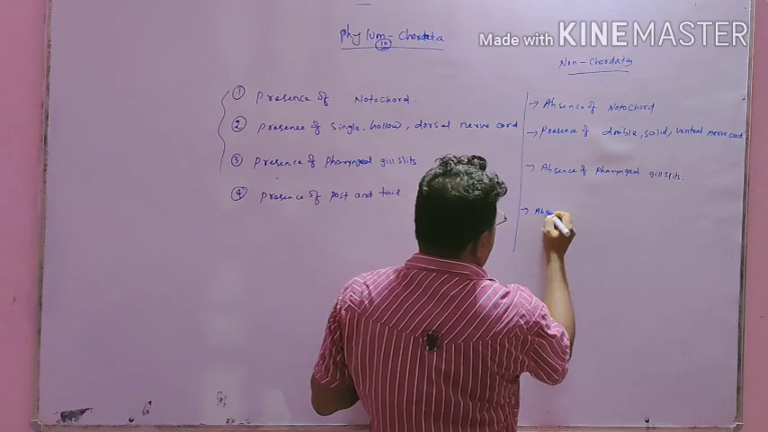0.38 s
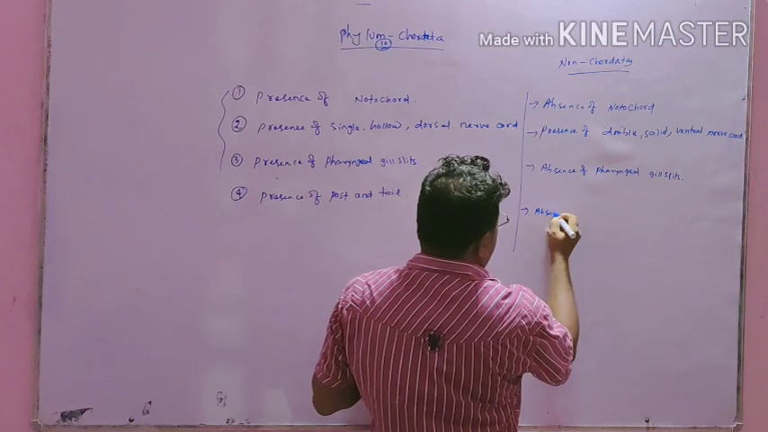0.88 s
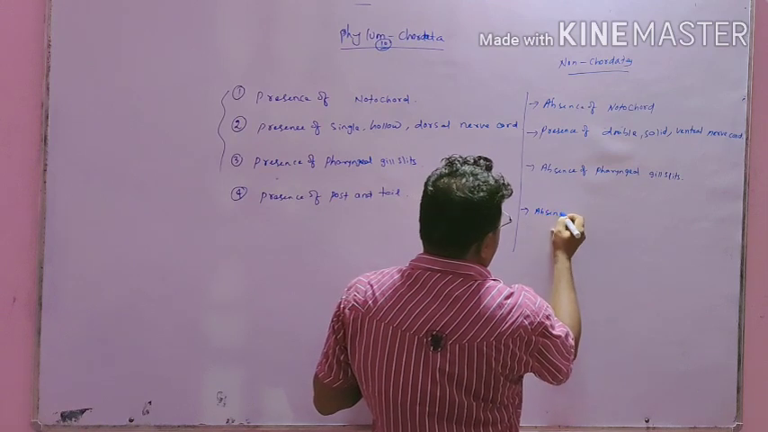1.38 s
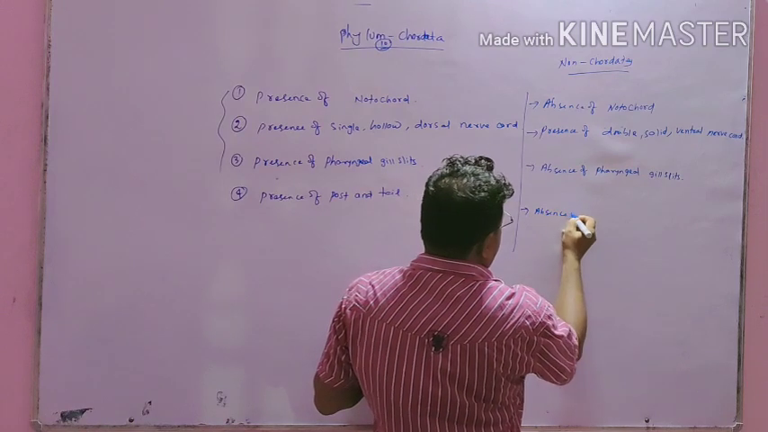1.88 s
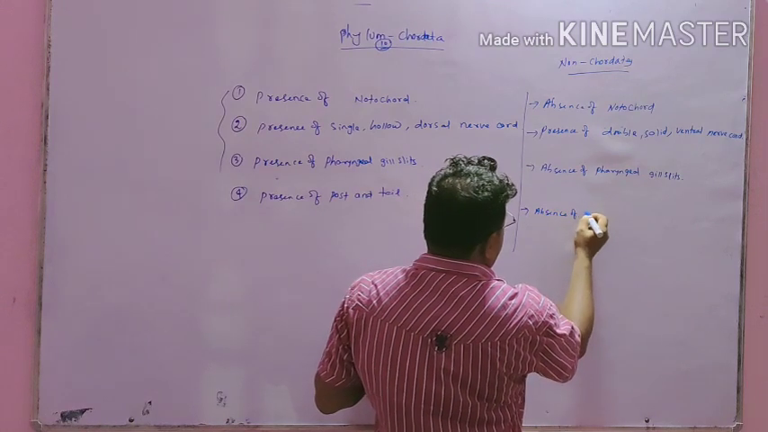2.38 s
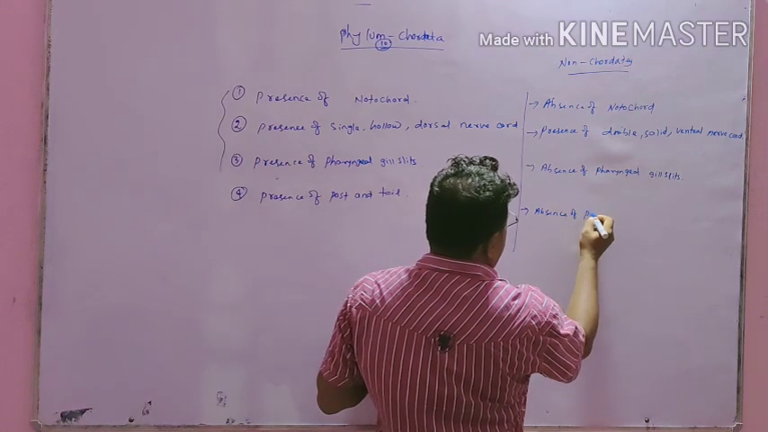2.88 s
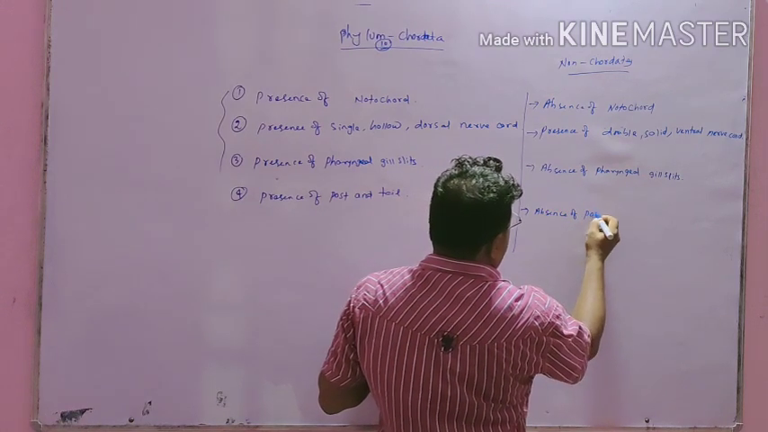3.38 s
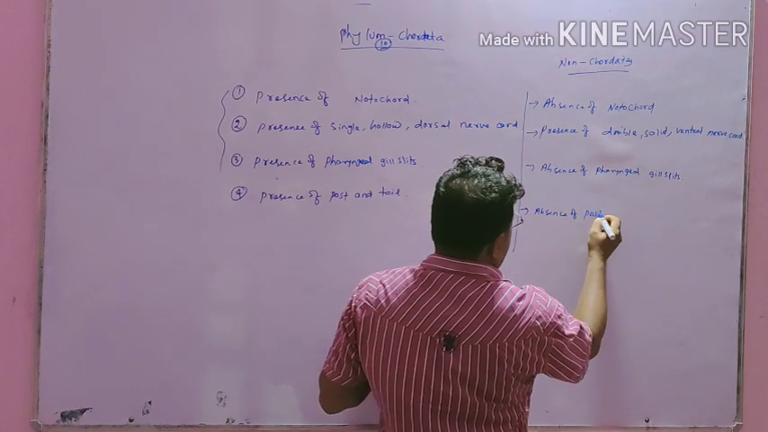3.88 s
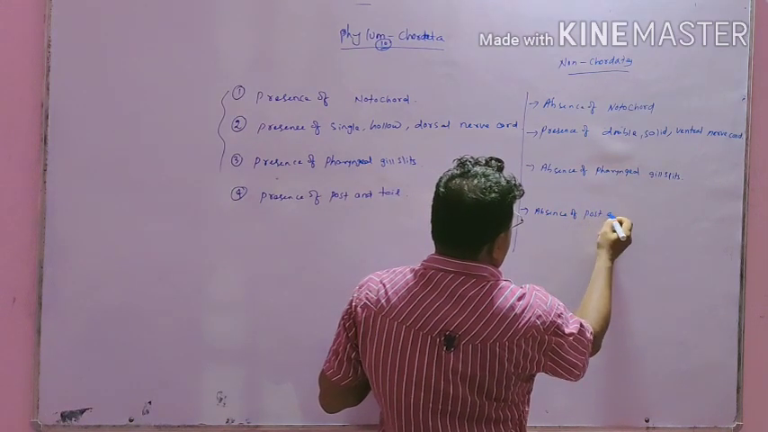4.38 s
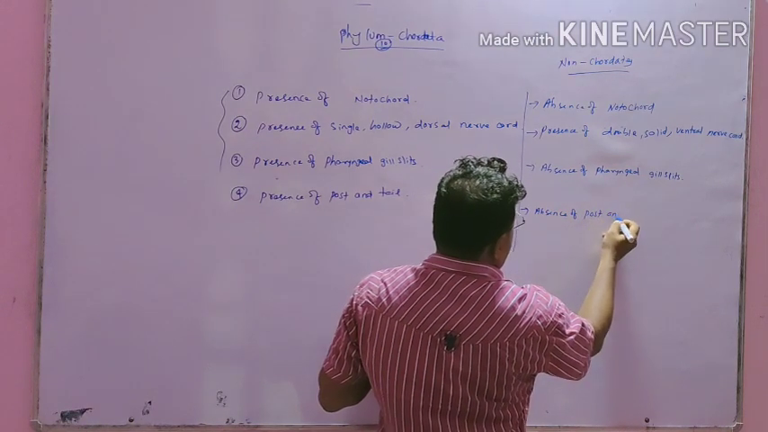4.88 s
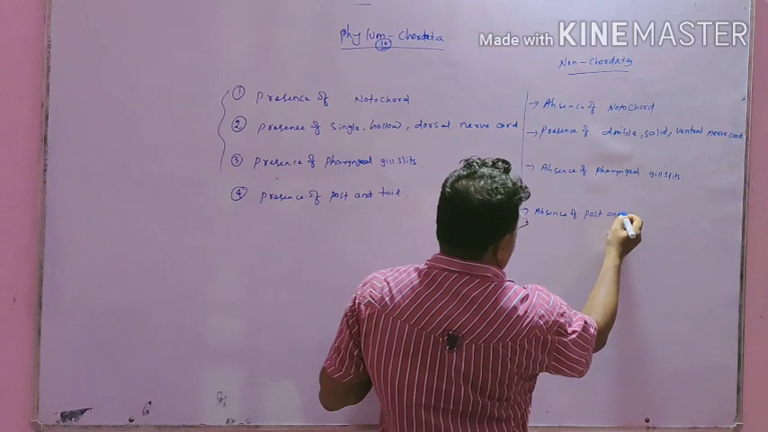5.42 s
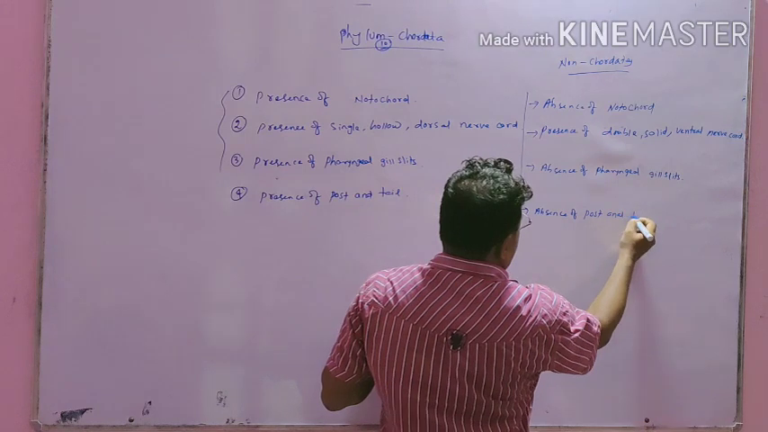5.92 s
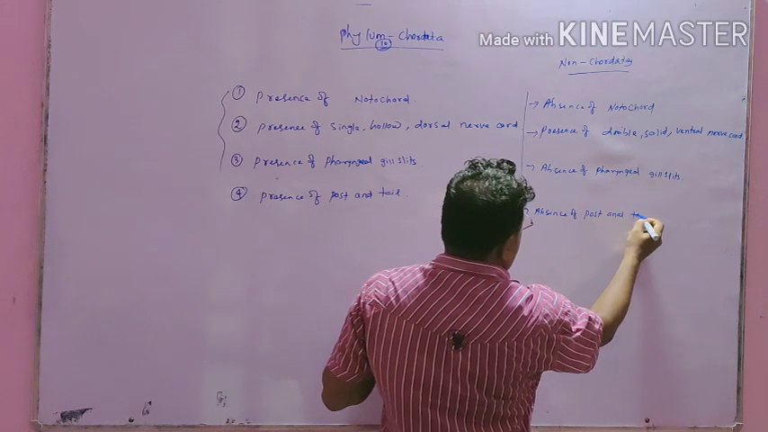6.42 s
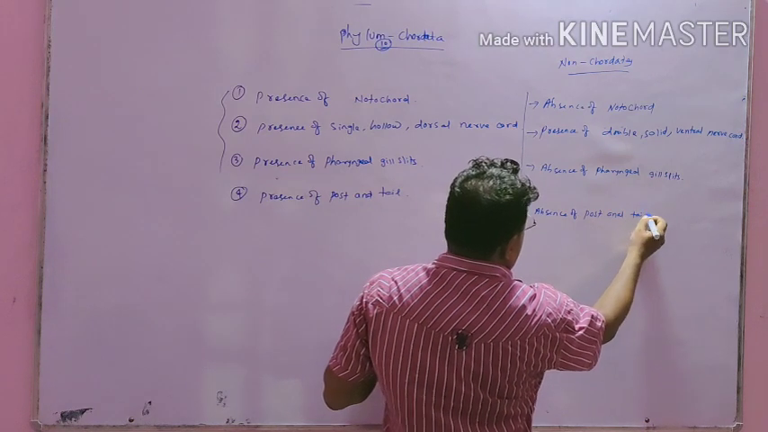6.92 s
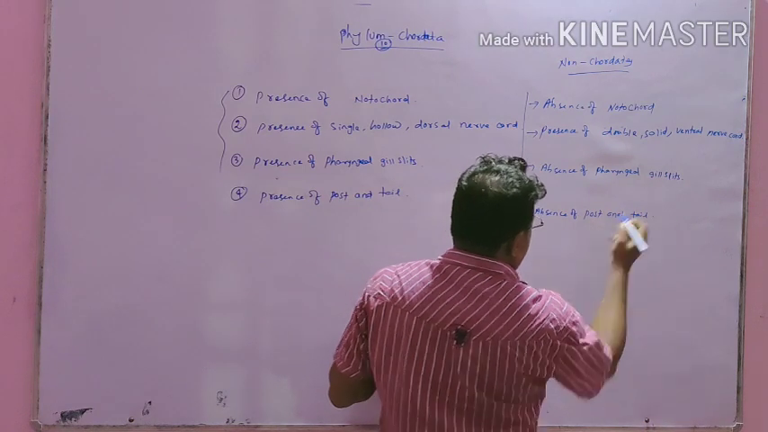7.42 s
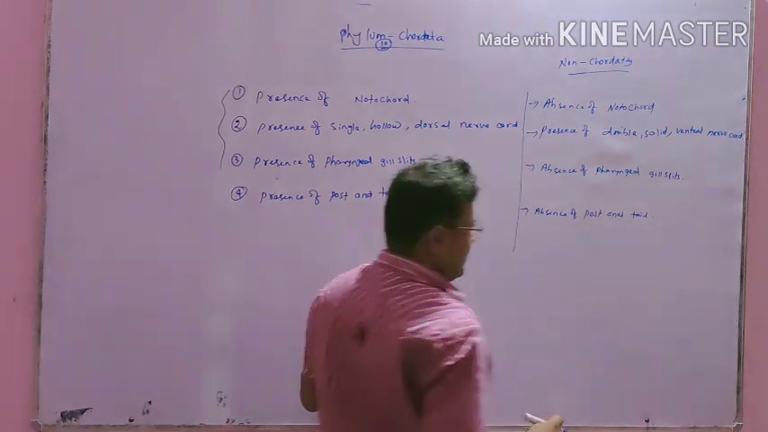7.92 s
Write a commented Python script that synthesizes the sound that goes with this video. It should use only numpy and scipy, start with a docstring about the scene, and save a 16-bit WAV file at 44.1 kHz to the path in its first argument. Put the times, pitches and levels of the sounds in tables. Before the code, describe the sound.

Low wind buffeting slaps the microphone, mostly on the left, in a quiet fan-cooled room with crickets and tiny far hoots behind.

```python
"""A draught from a fan rumbles and slaps in the two bare microphone ports, in a quiet room at night.
The wind is noise under gust envelopes, with sudden fronts, single eddies and one brief whistle, at each port
on its own. Crickets outside on both sides are narrow noise cut by wing strokes; far hoots and peeps are
gliding, wavering tones. Fan wash and outdoor rumble are shaped noise, the motor hum narrow bands of noise;
tiny random tonal pips and a faint hiss, such as digital processing leaves behind, lie underneath."""
import sys
import numpy as np
from scipy import signal
from scipy.io import wavfile
from scipy.ndimage import uniform_filter1d

SR = 44100
rng = np.random.default_rng(int(sys.argv[2]) if len(sys.argv) > 2 else 0)


def pcm_store(signal):
    """Save signal as 16-bit PCM."""
    levels = np.round(np.clip(np.atleast_2d(signal), -1, 1) * 32767)
    wavfile.write(sys.argv[1], SR, levels.astype(np.int16).T)


def magnitude_from_level(level_db):
    """Linear magnitude for a level in decibels (20 dB per decade)."""
    exponent = np.asarray(level_db, float) / 20
    return 10 ** exponent


N = 354255  # samples

# Draught gusts, one list each for left and right port: [arrival t/s, held t/s, level/dB, dying away/(dB/s)]
GUSTS = [
    [(0.0, 0.0028, -36, 65.5), (.25, 0.05, -38.5, 100), (.31, 0.019, -32.5, 148), (.39, 0.026, -26, 225.5),
     (.5, 0.015, -34, 61), (.743, 0.011, -42.5, 87), (1.062, 0.0066, -26.5, 247.5),
     (1.14, 0.096, -32, 69.5), (1.26, 0.05, -29.5, 159.5), (1.49, 0.0076, -32.5, 196),
     (1.52, 0.011, -23, 159.5), (1.65, 0.056, -43.5, 36), (1.77, 0.15, -40.5, 88),
     (2.595, 0.0076, -29, 172), (2.685, 0.0038, -18, 188), (2.81, 0.048, -28.5, 59),
     (3.013, 0.19, -25.5, 495), (3.265, 0.015, -23, 77.5), (3.4, 0.097, -28, 100),
     (3.545, 0.066, -26.5, 273), (3.69, 0.09, -29, 104), (3.86, 0.18, -35, 154.5),
     (3.985, 0.018, -23, 120.5), (4.06, 0.11, -25.5, 198.5), (4.205, 0.048, -29.5, 293.5),
     (4.3, 0.12, -41.5, 120.5), (4.565, 0.046, -21, 303.5), (4.67, 0.084, -26.5, 120),
     (5.16, 0.074, -37.5, 96), (5.708, 0.043, -44.5, 119), (6.615, 0.017, -28.5, 129.5),
     (6.745, 0.022, -31, 122), (6.81, 0.032, -26, 103.5), (7.31, 0.044, -50.5, 140)],
    [(.534, .005, -47, 44), (1.571, 0.2, -55, 162.5), (2.755, 0.062, -39.5, 131), (3.02, 0.033, -37, 63),
     (3.07, 0.053, -29, 98), (3.14, 0.078, -23.5, 112.5), (3.36, 0.016, -22.5, 200.5),
     (3.49, 0.023, -30.5, 186), (3.65, 0.07, -36.5, 203), (3.73, 0.0068, -22, 244),
     (3.8, 0.048, -34.5, 107), (4.01, 0.083, -28, 299), (4.1, 0.039, -24.5, 497),
     (4.19, 0.04, -41.5, 119.5), (4.765, 0.01, -51, 72), (5.18, 0.015, -47, 123)],
]
# Air between gusts at the left and right port: [lowest level/dB]
CALM_DB = [-86, -79]
GUST_RISE_DB_PER_S = 1099.5
# Gust fronts, left port then right, levels before the bass cut:
# [onset t/s, starting level/dB, starting upper edge f/Hz, time to fade by 20 dB t/s]
FRONTS = [
    [(0.002, -41.5, 550, 0.1), (0.334, -39.5, 529, 0.22), (1.524, -36.5, 1175, 0.12),
     (2.605, -38, 700, 0.07), (2.716, -34.5, 665, 0.2), (3.011, -33.5, 863, 0.07), (3.08, -28, 607, 0.2),
     (3.174, -29, 821, 0.1), (3.29, -35, 592, 0.54), (3.441, -36.5, 656, 0.42), (3.984, -26.5, 792, 0.07),
     (4.066, -36.5, 619, 0.48), (4.558, -36, 786, 0.24), (4.578, -27.5, 633, 0.12),
     (4.719, -40.5, 735, 0.16), (6.863, -51, 543, 0.5)],
    [(3.166, -30.5, 542, 0.18), (3.232, -26, 558, 0.03), (3.373, -34.5, 470, 0.3), (4.116, -32, 594, 0.2)],
]
# Single eddies slapping the left port, then the right: [centre t/s, peak level before the bass cut/dB, f/Hz]
SLAPS = [
    [(0.34, -17.5, 241), (0.743, -19.5, 118), (1.064, -17, 150), (1.518, -19.5, 145), (1.52, -19, 610),
     (1.541, -22.5, 518), (1.574, -29.5, 480), (1.543, -17.5, 222), (1.564, -18.5, 181),
     (1.839, -21.0, 252), (2.619, -15.5, 177), (2.692, -16.5, 170), (2.694, -22.5, 400),
     (2.723, -22.5, 470), (2.724, -12.5, 256), (3.013, -14, 145), (3.088, -9, 147), (3.089, -22, 380),
     (3.177, -14, 243), (3.217, -12, 150), (3.448, -18.5, 199), (3.503, -32, 453), (3.551, -12, 228),
     (3.552, -26.5, 377), (3.598, -15.5, 230), (3.599, -31, 400), (3.987, -29.5, 520), (3.988, -7, 133),
     (4.07, -25.5, 460), (4.024, -13, 248.5), (4.219, -13.5, 178), (4.582, -16, 422), (4.583, -13, 233),
     (4.61, -9, 147), (4.725, -12.5, 185), (4.758, -13.5, 188), (6.565, -24.5, 134), (6.765, -21, 166),
     (6.87, -21.5, 240)],
    [(3.161, -14.5, 158.6), (3.186, -19, 174), (3.423, -18, 202), (3.745, -21.5, 150), (4.095, -9.5, 186),
     (4.122, -8.5, 172)],
]
# Air whistling briefly at the left port: (onset t/s, time to fade by 20 dB t/s, f/Hz, width f/Hz, level/dB)
WHISTLE = (4.572, .12, 890, 100, -54)
LOW_HZ = np.arange(24)[:, None] * SR / 512  # wind noise bins, up to 2 kHz

# Spectrum of fan wash and outdoor rumble: [f/Hz, relative level per Hz/dB]
ROOM = [(60, -1.5), (200, -6.5), (300, -8.5), (460, -8), (960, -14.5), (1150, -20.5), (1340, -27.5),
        (1800, -26.5), (5000, -43), (8000, -44)]
# How alike that wash is at the two ports: [f/Hz, left-right likeness from -1 to 1]
SAME = [(240, 0.08), (470, 0.82), (940, 0.18), (1800, 0.033)]
# Fan motor hum, before the bass cut: [f/Hz, level/dB]
HUM = [(102, -71.5), (199, -71), (350, -75.5), (2618, -102)]
ROOM_DB = -63.5  # wash rms before the bass cut

# Steady cricket, heard on both sides, straying behind (positive) or ahead (negative) of its beat: [t/s, lag t/s]
LAG = [(0, 0.0068), (2.2, -0.067), (3.5, 0.075), (4.1, 0.053), (4.4, 0.022), (4.7, -0.0084), (6.8, 0.052),
       (7.7, -0.019)]
# Its wing on the left, then the right: [f/Hz, width f/Hz, typical level/dB]
BEAT_WING = [(6930, 59, -80.5), (7040, 54, -78.5)]
BEAT_S, BEAT_CHIRP_S, BEAT_SPREAD_DB = .334, .13, 2.5
# Fitful cricket on the left, another on the right: [start t/s, length t/s, level/dB]
CALLS_FITFUL = [
    [(0.32, 0.19, -68), (.94, 0.12, -69.5), (1.3, 0.096, -72), (1.63, 0.18, -72), (1.89, 0.054, -72.5),
     (2.59, 0.057, -75.5), (2.92, 0.11, -72), (3.31, 0.17, -68), (3.64, .06, -75.5), (4.05, 0.12, -72),
     (4.29, 0.16, -69.5), (4.95, 0.087, -76), (5.64, 0.12, -67.5), (5.86, 0.06, -71.5), (6.01, 0.1, -70.5),
     (6.34, 0.15, -70), (6.68, 0.14, -71), (6.87, 0.065, -75), (7.05, 0.072, -70.5), (7.33, 0.12, -72.5),
     (7.66, 0.19, -76), (7.95, 0.068, -74)],
    [(.02, 0.027, -71), (.32, 0.089, -81.5), (1.25, 0.18, -82.5), (2.25, 0.14, -79), (4.6, 0.13, -75),
     (5.3, 0.17, -81), (5.98, 0.17, -77)],
]
# Their wings, left then right: [f/Hz, width f/Hz]
FITFUL_WING = [(6690, 91), (6790, 100)]
# Farther insects on the left, then the right: [level/dB]
CHORUS_DB = [-81.5, -92]
STROKES_PER_S = 62  # average wing stroke rate

# Far hoots: [middle t/s, length t/s, f/Hz, glide f/Hz, starting level/dB, left minus right level/dB]
HOOTS = [(0.259, 0.042, 845, 0, -64, -12), (1.435, 0.065, 512, 91, -62.5, -14),
         (1.78, 0.069, 488, -63, -58.5, -14.5), (1.948, 0.12, 532, 30, -63.5, -12),
         (2.127, 0.056, 539, 20, -61, 16.5), (2.305, 0.078, 560, 40, -56.5, 11),
         (2.465, 0.062, 538, -32, -58, -15.5), (5.96, 0.03, 472, 15, -58, -10),
         (6.04, .12, 483.5, -16, -56.5, -1), (6.066, 0.085, 612, -12, -54.5, 12.5),
         (6.415, 0.043, 448, -21, -55, -7.5), (6.815, 0.055, 719, 4, -64, -10),
         (7.291, 0.028, 620, -38, -60, 0), (7.762, 0.021, 584, 22, -61, 15),
         (7.825, 0.046, 470, -18, -63, -6), (0.258, 0.055, 1790, 2, -79, 17)]
# One small far caller on a single note: [middle t/s, starting level/dB]
PEEPS = [(5.98, -81), (6.95, -81), (7.59, -81), (7.83, -78)]
PEEP_HZ, PEEP_S = 1445, .04

BAND_TOP_HZ = 8080  # the scene is band-limited here by processing
HISS_DB, FLARE_DB = -94.5, -19  # faint steady hiss left by processing; sound level at which the noise doubles


def evened(x):
    """Scales to rms 1."""
    return x / np.sqrt(np.mean(x ** 2) + 1e-20)


def read(points, hz):
    """Reads a spectrum on a log frequency axis."""
    f, value = np.transpose(points)
    return np.interp(np.log(hz + 1), np.log(f + 1), value)


def add(mix, s, sound):
    """Adds a sound to the mix in place, from time s on."""
    part = mix[..., max(round(s * SR), 0):][..., :sound.shape[-1]]
    part += sound[..., :part.shape[-1]]


def wander(size, count=N):
    """Smooth chance of rms 1 that turns about every `size` samples."""
    return evened(signal.oaconvolve(rng.standard_normal(count), np.blackman(3 * size), "same"))


def resonate(x, hz, width):
    """A resonance: shifts hz down to zero, smooths twice, shifts back."""
    turn = np.exp(2j * np.pi * hz * np.arange(len(x)) / SR)
    r = np.exp(-np.pi * width / SR)
    smooth = signal.lfilter([(1 - r) ** 2], [1, -2 * r, r * r], x / turn)
    return 2 * (turn * smooth).real


def bass_cut(x, hz=97):
    """The small microphone loses the deepest bass."""
    return signal.sosfilt(signal.butter(4, hz, "high", fs=SR, output="sos"), x)


def low_noise(gain):
    """Noise below 2 kHz from random short-time spectra; gain is LOW_HZ by steps of 128 samples."""
    a, b = rng.standard_normal((*gain.T.shape, 2)).T
    spectra = np.zeros((257, gain.shape[1]), complex)
    spectra[:len(gain)] = (a + 1j * b) * gain
    return signal.istft(spectra, nperseg=512, noverlap=384)[1]


def gust_level(rows, calm_db):
    """Each gust rises fast, holds and dies away; the strongest rules. Gives (s, dB) every 128 samples."""
    t = np.arange(N // 128 + 5) * 128 / SR
    s, held, level_db, dying = np.transpose(rows)[:, :, None]
    rise_loss_db = GUST_RISE_DB_PER_S * np.maximum(s - t, 0)
    loss_db = rise_loss_db + dying * np.maximum(t - s - held, 0)
    strongest_db = (level_db - loss_db).max(axis=0)
    return np.transpose([t, np.maximum(strongest_db, calm_db)])


def draught(rows, lumps_db=3.0, bend=1.4):
    """Turbulence: stronger air makes smaller eddies, so the spectrum falls less steeply."""
    s, level_db = np.transpose(rows)
    steps = np.arange(N // 128 + 5) * 128 / SR
    fall_db = 15.5 - 0.93 * np.interp(steps, s, level_db)  # up to 400 Hz
    air = bass_cut(low_noise(magnitude_from_level(-fall_db * (LOW_HZ / 400) ** bend))[:N])
    air *= magnitude_from_level(lumps_db * wander(size=260))  # eddies arrive in lumps
    power = uniform_filter1d(uniform_filter1d(air ** 2, size=2000), size=2000)
    air /= np.sqrt(power + 1e-20)  # flatten slow swings, so that the gusts set the level
    return air * magnitude_from_level(np.interp(np.arange(N) / SR, s, level_db))


def room(patchy_db=2.5):
    """Fan wash and outdoor rumble with drifting patches, and the wavering motor hum."""
    frames, hz = N // 256 + 5, np.fft.rfftfreq(1024, 1 / SR)
    a, b, c, d, patches = rng.standard_normal((frames, 513, 5)).T
    patches = uniform_filter1d(patches, size=4, axis=0)
    patches = evened(uniform_filter1d(patches, size=10, axis=1))
    same = np.clip(read(SAME, hz), -1, 1)[:, None]
    left = a + 1j * b
    right = same * left + np.sqrt(1 - same ** 2) * (c + 1j * d)
    spectra = np.array([left, right]) * magnitude_from_level(read(ROOM, hz)[:, None] + patchy_db * patches)
    wash = signal.istft(spectra, nperseg=1024, noverlap=768)[1][:, :N]
    hum = sum(magnitude_from_level(db) * evened(resonate(rng.standard_normal(N), f, 14 + f / 90)) for f, db in HUM)
    return magnitude_from_level(ROOM_DB) * evened(wash) + hum


def cricket(rows, hz, width):
    """Wing strokes, strong and weak in turn, scrape one wing tone."""
    turns = np.cumsum(STROKES_PER_S * (1 + 0.099 * wander(size=3000))) / SR
    strokes = (1 + 0.24 * np.cos(2 * np.pi * turns)) * (1 + 0.13 * np.cos(np.pi * turns))
    swell = np.zeros(N)
    for start, length, db in rows:
        chirp = signal.windows.tukey(round((length + 0.062) * SR), .8)  # soft edges reach past the call
        add(swell, start - .035, magnitude_from_level(db) * chirp)
    return swell * evened(strokes) * evened(resonate(rng.standard_normal(N), hz, width))


def crickets(side):
    """A steady cricket, a fitful one, and farther insects that blur into a chorus."""
    hz, width, db = BEAT_WING[side]
    steady = []
    for s in np.arange(0, N / SR, BEAT_S):
        lag = np.interp(s, *np.transpose(LAG))
        steady.append((s + lag, BEAT_CHIRP_S, db + BEAT_SPREAD_DB * rng.standard_normal()))
    chorus = magnitude_from_level(CHORUS_DB[side]) * evened(resonate(rng.standard_normal(N), 6630, 800))
    return cricket(steady, hz, width) + cricket(CALLS_FITFUL[side], *FITFUL_WING[side]) + chorus


def pips(count=90, pip_db=-85):
    """Tiny random tonal pips, such as a noise suppressor leaves behind, each on one side."""
    out, t = np.zeros((2, N)), np.arange(2200) / SR
    for when, pitch, size, side in rng.random((count, 4)):
        hz = 900 * 2.9 ** pitch
        level = magnitude_from_level(pip_db + read(ROOM, hz) - read(ROOM, 1400) + 11 * size)  # follows the room's spectrum
        pip = level * np.hanning(len(t)) * np.sin(2 * np.pi * hz * t)
        add(out[int(2 * side)], when * N / SR, pip)
    return out


def fronts(rows, low_hz=260, dulling=0.36, rise=.005, lumps_db=4.5):
    """A gust front sets in at once with small eddies, which die and dull as it passes."""
    out, steps = np.zeros(N), np.arange(100) * 128 / SR
    for s, peak_db, edge_hz, fade in rows:
        fade = max(fade, .02)
        edge = edge_hz * np.exp(-dulling * steps / fade)
        tilt = LOW_HZ ** 2 / (LOW_HZ ** 2 + low_hz ** 2)  # weakens the bass
        fizz = low_noise(magnitude_from_level(-24 * (LOW_HZ / edge) ** 3.7) * tilt)
        t = np.arange(len(fizz)) / SR
        swell = np.sin(np.pi / 2 * np.minimum(t / rise, 1)) ** 2 * magnitude_from_level(peak_db - 20 * t / fade)
        swell *= magnitude_from_level(lumps_db * wander(size=180, count=len(t)))
        swell *= np.cos(np.pi / 2 * t / t[-1])  # down to silence at the end
        add(out, s - rise / 2, swell * fizz / np.std(fizz[:2000]))
    return bass_cut(out)


def hoots(spread_hz=75, clear=.55, sag_db=7):
    """Each hoot or peep is a tone, gliding or level, that sags, wavers and is blurred by echoes."""
    out, t = np.zeros((2, N)), np.arange(9000) / SR
    peeps = [(s, PEEP_S, PEEP_HZ, 0, db, 0) for s, db in PEEPS]
    for s, length, hz, glide_hz, db, pan_db in list(HOOTS) + peeps:
        swell = np.minimum(t / 0.0056, 1)
        swell = swell * magnitude_from_level(-sag_db * t / length - 260 * np.maximum(t - length, 0))
        pitch = hz + glide_hz * (np.minimum(t / length, 1) - .5)
        turn = np.exp(2j * np.pi * np.cumsum(pitch) / SR)
        a, b, c, d = [evened(resonate(rng.standard_normal(len(t)), 0, spread_hz)) for part in range(4)]
        echoes = np.array([a + 1j * b, c + 1j * d]) / 2  # its own blur at each port
        tone = evened((turn * (clear + echoes)).real)
        level = magnitude_from_level(db + pan_db / 2 * np.array([[1], [-1]]))
        add(out, s - length / 2, level * swell * tone)
    return out


def slaps(rows, rise=0.5, fade=0.74):
    """One eddy: a short low thump of random phase, rising faster than it fades (both in cycles)."""
    out, t = np.zeros(N), np.arange(-600, 900) / SR
    for s, peak_db, hz in rows:
        cycles = t * hz
        width = rise + (fade - rise) * (1 + np.tanh(cycles)) / 2  # passes smoothly from rise to fade
        swell = np.exp(-(cycles / width) ** 2)
        add(out, s + t[0], magnitude_from_level(peak_db) * swell * np.cos(2 * np.pi * (cycles + rng.random())))
    return bass_cut(out)


def whistle(s, length, hz, width, db):
    """Air whistling at a port: a fuzzy tone of narrow noise that sets in at once and thins out."""
    t = np.arange(N) / SR - s
    swell = np.clip(t / 0.0091, 0, 1) * magnitude_from_level(db - 20 * (np.maximum(t, 0) / length) ** 2)
    return swell * evened(resonate(rng.standard_normal(N), hz, width))


def scene():
    """Wind and crickets differ at each port; the room is shared."""
    wind = []
    for k in range(2):
        air = draught(gust_level(GUSTS[k], CALM_DB[k]))
        wind.append(air + fronts(FRONTS[k]) + slaps(SLAPS[k]))
    wind[0] = wind[0] + whistle(*WHISTLE)
    outside = np.array([crickets(side=k) for k in range(2)]) + hoots()
    return np.array(wind) + outside + pips() + bass_cut(room())


def low_pass(x):
    """Removes everything above the highest recorded frequency."""
    return signal.sosfilt(signal.butter(12, 15700, fs=SR, output="sos"), x)


def record(dry):
    """The band limit, and a faint hiss with processing noise that swells at the loudest moments."""
    top = signal.firwin(401, BAND_TOP_HZ, window=("kaiser", 10), fs=SR)
    power = uniform_filter1d(dry ** 2, size=600, axis=1)
    swell = 1 + (power / magnitude_from_level(FLARE_DB) ** 2) ** 2
    noise = magnitude_from_level(HISS_DB) * swell * rng.standard_normal(dry.shape)
    mix = signal.oaconvolve(dry, top[None], "same") + noise
    return low_pass(mix)


dry = scene()
out = record(dry)
pcm_store(out)
```